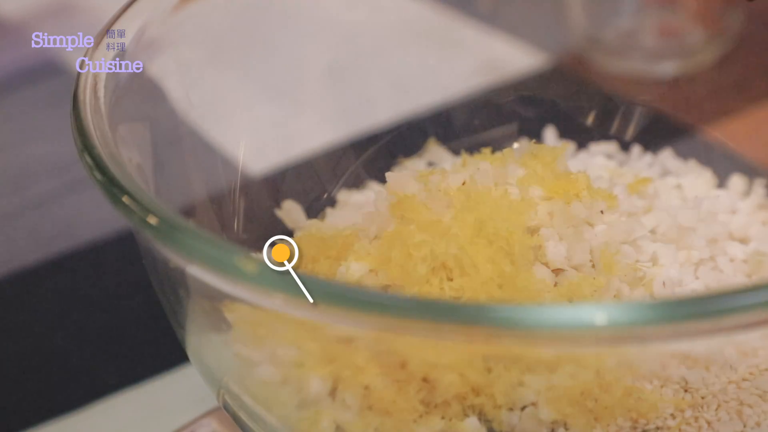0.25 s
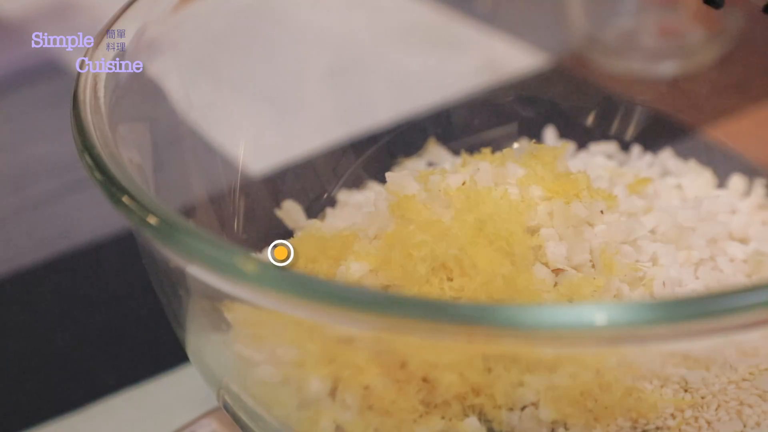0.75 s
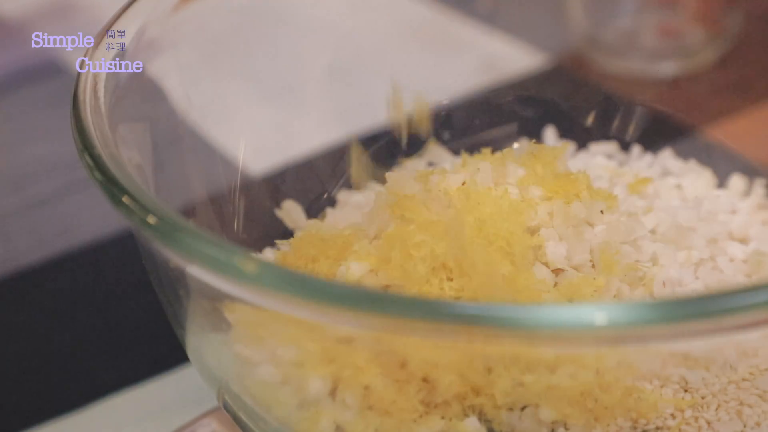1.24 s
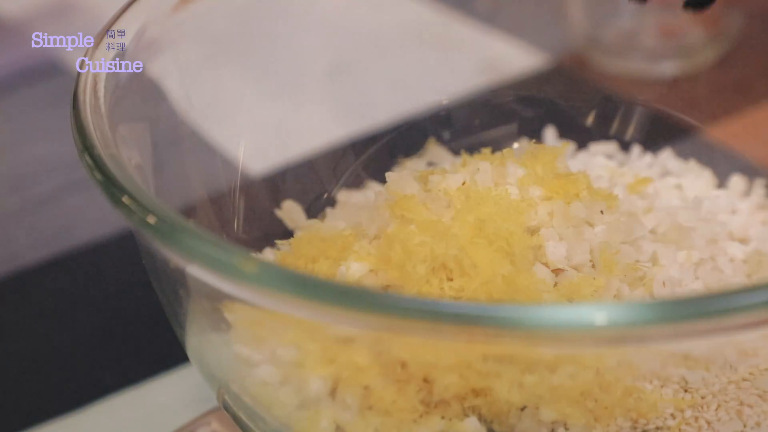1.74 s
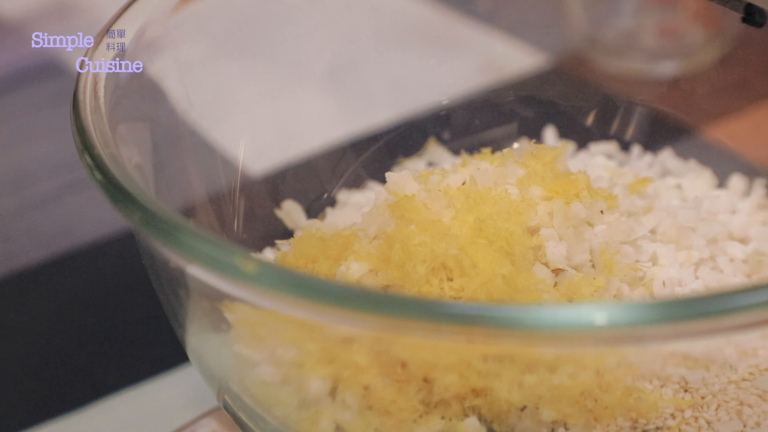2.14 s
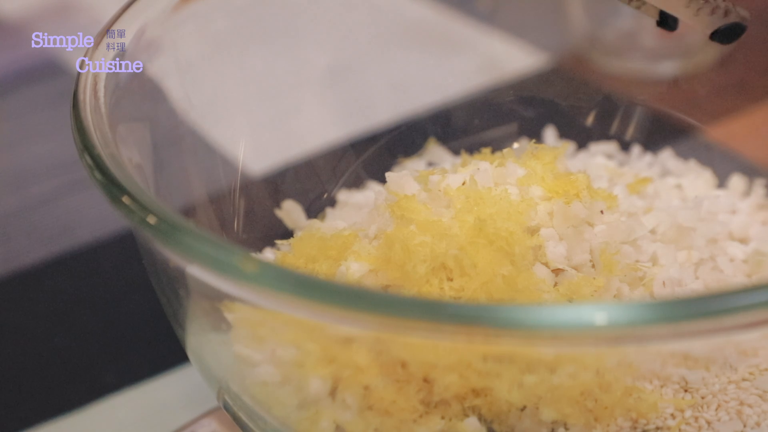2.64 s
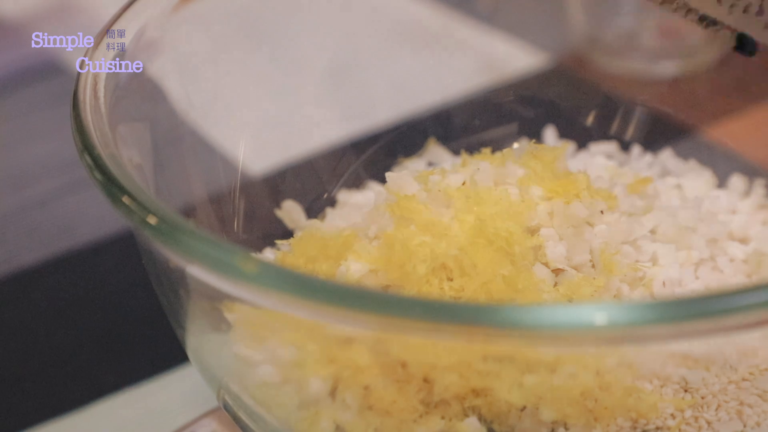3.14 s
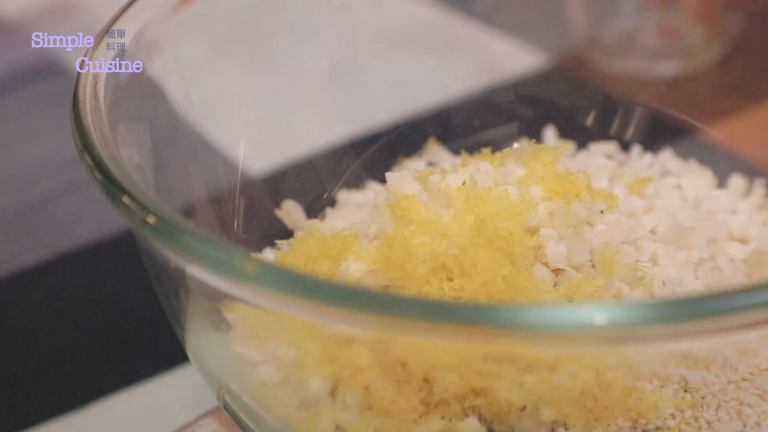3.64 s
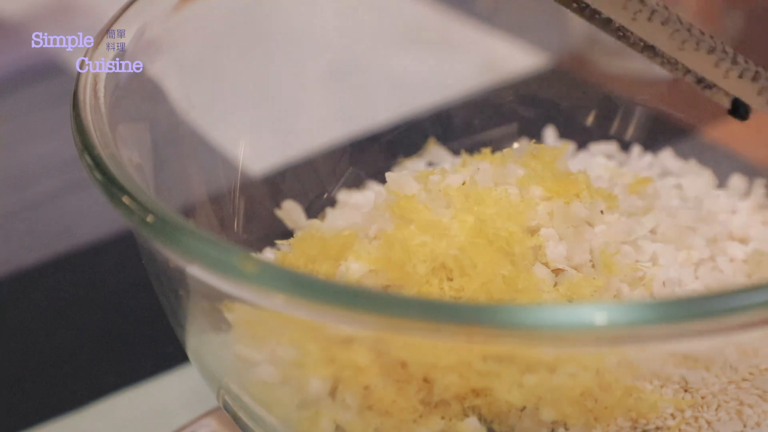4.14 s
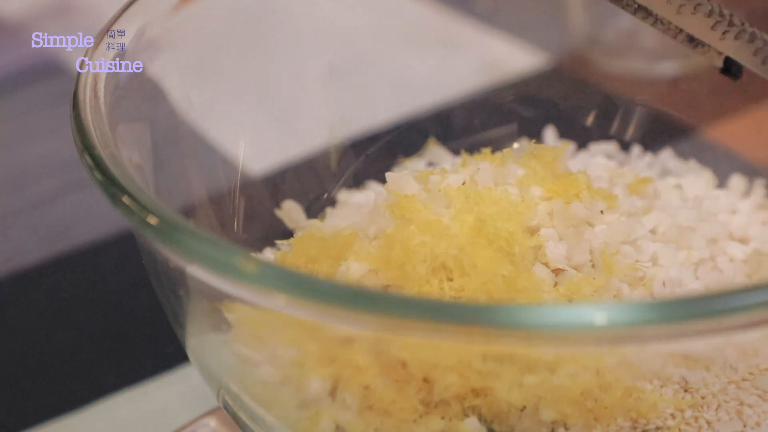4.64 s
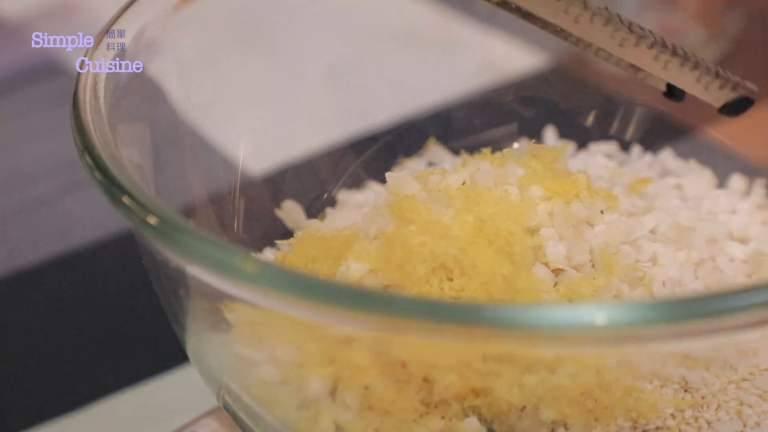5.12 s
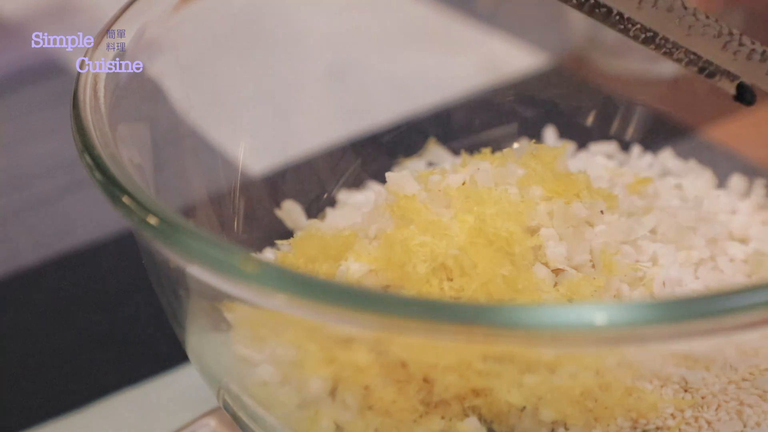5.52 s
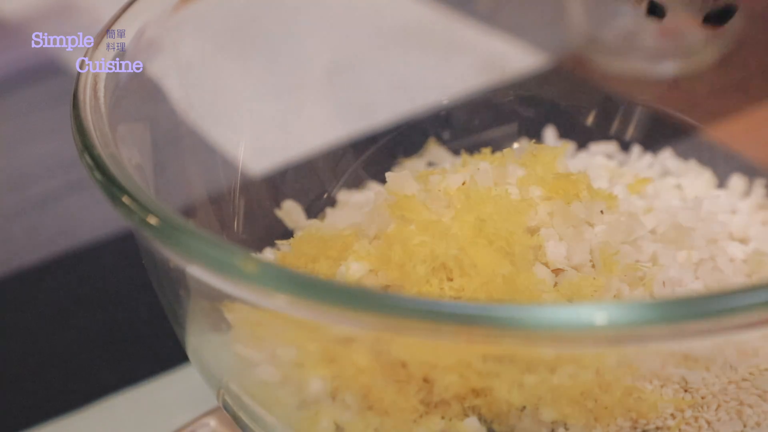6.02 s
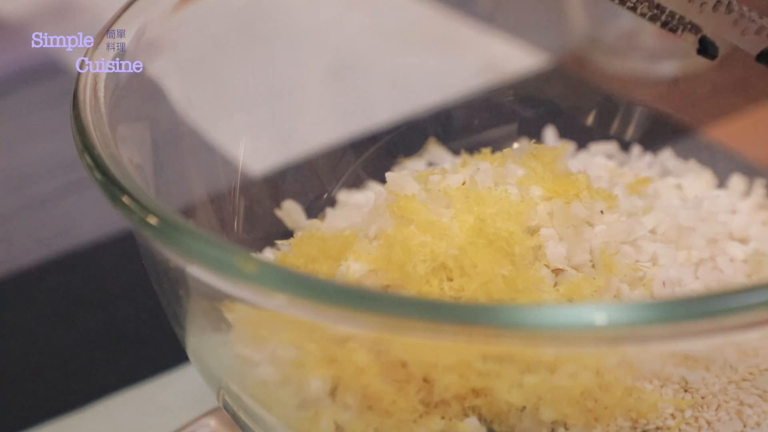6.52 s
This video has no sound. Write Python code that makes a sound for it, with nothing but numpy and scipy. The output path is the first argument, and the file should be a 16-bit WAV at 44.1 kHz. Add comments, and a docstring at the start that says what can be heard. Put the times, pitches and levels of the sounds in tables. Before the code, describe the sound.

Very close in a quiet kitchen, citrus peel is rasped over a fine metal grater above a glass bowl. Five strong, bright strokes alternate with lighter returns, then a sharp knock and two longer, softer rasps. Another knock leads into a pause of faint ticks and finger rustle. Sparse light scrapes follow, then a flurry of short scratches with one longer rasp. Low room rumble and slight hiss remain underneath.

```python
"""In a quiet kitchen, citrus peel is drawn in quick strokes over a fine steel grater above a glass bowl, close by.
Random catches of peel on teeth ring modes of the perforated plate and teeth, under a pressure curve per stroke.
The grater gets a few knocks; ticks and a faint rustle of fingers and peel are filtered crackle and noise.
Below lie noise-band rumble, narrow hums and microphone hiss. The converter clips peaks at full scale."""
import sys
import numpy as np
from scipy import signal
from scipy.io import wavfile
from scipy.ndimage import uniform_filter1d

SR = 44100
rng = np.random.default_rng(int(sys.argv[2]) if len(sys.argv) > 2 else 0)


def master(y):
    """Save y as 16-bit WAV."""
    cut = np.clip(np.atleast_2d(y).T, -1, 1)
    pcm = np.round(cut * 32767)  # scale
    wavfile.write(sys.argv[1], SR, pcm.astype(np.int16))


N = 298537

# resonances of the perforated plate: mode_hz, width_hz, relative_level_db
PLATE_MODES = [(1410, 220, -10.5), (1910, 250, -6), (1990, 127, 5.5), (2262, 110, -6.5), (2790, 210, 1.5),
               (3063, 460, 2), (3594, 150, -0.5), (4340, 720, -8), (4820, 190, -10.5), (6360, 1800, -11.5)]
# resonances of the teeth: mode_hz, width_hz, relative_level_db
TEETH_MODES = [(5980, 5200, -9.5), (7120, 380, 0.5), (7590, 110, 3.5), (8150, 1100, -2), (8660, 1200, -2.5),
               (10570, 610, -0.5), (11760, 1100, -12), (11800, 2800, -11.5), (14200, 2500, -11)]


def undb(db):
    """Decibels to gain."""
    return 10 ** (np.asarray(db) / 20)


def unit(x):
    """Scale to rms 1."""
    return x / np.sqrt(np.mean(x ** 2))


def ring(x, modes):
    """Sum of resonances; neighbours alternate in sign so that the valleys between them stay filled."""
    out = 0
    for k, (hz, width_hz, db) in enumerate(modes):
        b, a = signal.iirpeak(hz, hz / abs(width_hz), SR)
        out = out + (-1) ** k * undb(db) * signal.lfilter(b, a, x)
    return out


def steep(x, hz, kind):
    """Fourth-order Butterworth low- or high-pass."""
    return signal.sosfilt(signal.butter(4, hz, kind, fs=SR, output="sos"), x)


def walk(rate_hz):
    """Random levels held 1 / rate_hz s and slewed twice; spread near 1."""
    k = int(SR / rate_hz)
    steps = np.repeat(rng.standard_normal(N // k + 1), k)
    return 0.77 * uniform_filter1d(uniform_filter1d(steps, k), k)[:N]


def clicks(per_s, spread_db):
    """Random clicks of either sign, most small, a few large; rms 1."""
    hit = rng.random(N) < per_s / SR
    return unit(hit * rng.standard_normal(N) * undb(spread_db * rng.exponential(size=N)))


def grater():
    """Teeth catch and let go of the peel; the grip judders; each catch rings plate and teeth."""
    split_hz = 3300  # lower from upper plate modes
    lower_gain, upper_gain, teeth_gain = pressure()
    judder_db = 1.1 * walk(120) + 0.6 * walk(40)
    catches = clicks(per_s=20000, spread_db=1.0) * undb(judder_db)
    lower_modes = [m for m in PLATE_MODES if m[0] < split_hz]
    upper_modes = [m for m in PLATE_MODES if m[0] >= split_hz]
    out = 0
    for modes, gain in ((lower_modes, lower_gain), (upper_modes, upper_gain), (TEETH_MODES, teeth_gain)):
        part, power = 0, 0
        for mode in modes:
            # teeth sit all over the mode shape and push it either way;
            # the contact point slides, so each mode is fed unevenly
            fed = catches * rng.choice([-1., 1.], N) * undb(2.3 * walk(30))
            part = part + ring(fed * gain, [mode])
            power = power + np.var(ring(fed, [mode]))
        out = out + part / np.sqrt(power)
    # the frame passes a little of the push on as a dull rumble
    rumble = unit(ring(catches, [(550, 290, 0), (900, 960, -4.5)])) * lower_gain * undb(-31.5)
    # little of the plate's sound reaches below about 1 kHz
    out = steep(steep(out, 1316, "high"), 780, "high")
    # the ring falls away above about 12 kHz
    return steep(out, 12600, "low") + rumble


def pressure():
    """Gains of lower modes, upper modes and teeth: each stroke has attack, hold, release and weak after-drag."""
    # cutting strokes: bite_s, hold_s, attack_s, lower_modes_db, change_over_hold_db, upper_above_lower_db,
    # teeth_above_lower_db, upper_rise_over_hold_db, teeth_rise_over_hold_db
    pushes = [(0.134, 0.083, 0.0045, -17, -5.5, -3.0, 4.5, 10, -3),
              (0.409, 0.083, 0.0055, -13.5, -6, -6, 1, 15.5, 2.5),
              (0.655, 0.07, 0.0051, -16, 1.5, -6.5, -0.5, 2, -3.5),
              (0.891, 0.062, 0.0044, -13, -6, -5.5, -1, 1.5, 2),
              (1.125, 0.078, 0.0056, -10, -15, -4.5, 1, 5.5, 1.3),
              (1.528, 0.095, 0.012, -20.5, -1, -6.5, -1, 13, 7),
              (1.637, 0.11, 0.0046, -20.5, 1, -1.0, -0.5, 10, 11.5),
              (3.881, 0.015, 0.0024, -28.5, 5.5, -13, -8.5, 9, 11),
              (3.982, 0.016, 0.0033, -24, -3.5, -2.5, 8.5, 3, 3),
              (4.493, 0.076, 0.0052, -27.5, 7, -3, 2, 7, 3.5),
              (4.718, 0.04, 0.0012, -33, 13, -1.5, -0.5, 3, 7),
              (4.775, 0.016, 0.005, -24.5, -11, -1.5, 1, 3, -2.5),
              (5.648, 0.016, 0.0057, -20, -11, 0.5, 1.5, -3.5, 1.3),
              (5.687, 0.027, 0.005, -22, -12.5, -0.5, -2, 0, 3),
              (5.761, 0.029, 0.0012, -22, 2, 2, 6, 7, -1),
              (5.789, 0.034, 0.0063, -22.5, 7.5, -6, 6.5, -4, -1.5),
              (5.844, 0.15, 0.023, -16, -9, 0, 1, 3, -4.7),
              (6.047, 0.019, 0.047, -34, -12.5, -3.0, -11, 8, 0.1),
              (6.37, 0.024, 0.0058, -26.5, -11, -7, -9, 4, 0.1),
              (6.511, 0.015, 0.0029, -23.5, -6.5, -5.0, -10.5, -1, -5),
              (6.544, 0.029, 0.0036, -12.5, -18, -3.5, -2, 6, 0.1),
              (6.593, 0.018, 0.003, -21.5, -12, -8, -5, 3, -5),
              (6.741, 0.014, 0.0029, -19, 0.5, -14.5, -5.5, 0, 3)]
    # lighter return strokes: same columns
    pulls = [(0.022, 0.058, 0.011, -28, -13, -18, 7.1, 2.3, 12.5),
             (0.287, 0.076, 0.018, -24.5, 1.5, -11.5, 0.5, 3.1, 5),
             (0.552, 0.058, 0.0093, -18, -11, -9, 5.6, 2.5, 9.5),
             (0.789, 0.053, 0.0071, -26.0, -11.5, -10, 8, 2.3, 12),
             (1.009, 0.062, 0.0071, -31.5, 5.5, -10.5, 5.8, 2.1, 10.5),
             (5.073, 0.032, 0.011, -38, -5, -0.5, 5.7, 2.3, 3),
             (5.309, 0.049, 0.0066, -49.5, 12, -30, 1.9, 1.6, 4)]
    # rows lower modes, upper modes, teeth: release_s, after_drag_db, mid_hold_arch_db
    push_shape = [(0.01, -6.5, 3.5), (0.011, -5.5, 4.5), (0.009, -26, 5.5)]
    # return strokes: same rows and columns
    pull_shape = [(0.0075, -25.5, 3.1), (0.0075, -26.5, 6), (0.0072, -24.5, 8.3)]
    drag_s, margin_s = 0.021, 0.15
    t, power = np.arange(N) / SR, np.zeros((3, N))
    for rows, shape in ((pushes, push_shape), (pulls, pull_shape)):
        for bite_s, hold_s, attack_s, db, change_db, upper_db, teeth_db, upper_rise_db, teeth_rise_db in rows:
            near = slice(max(int((bite_s - margin_s) * SR), 0), int((bite_s + hold_s + margin_s) * SR))
            since_s = t[near] - bite_s
            along = np.clip(since_s / hold_s, 0, 1)
            after_s = np.maximum(since_s - hold_s, 0)
            attack = np.exp(np.minimum(since_s, 0) / attack_s)
            layers = ((0, 0), (upper_db, upper_rise_db), (teeth_db, teeth_rise_db))
            for k, (above_db, rise_db) in enumerate(layers):
                release_s, drag_db, arch_db = shape[k]
                held_db = db + above_db + change_db * along + rise_db * (along - 0.5)
                held_db = held_db + arch_db * np.sin(np.pi * along)
                drag = undb(drag_db) * np.exp(-after_s / drag_s)
                lift = np.maximum(np.exp(-after_s / release_s), drag)
                power[k, near] += (undb(held_db) * attack * lift) ** 2
    return np.sqrt(power)


def knocks():
    """A blow that chatters for ms at most, rings plate and teeth, thuds in the frame and leaves a short rattle."""
    # knocks on the grater: start_s, plate_peak_db, thud_above_plate_db, teeth_above_plate_db, chatter_s, rattle_db
    blows = [(1.4404, -5.5, -16, -21, 0.0054, -17), (2.3386, -10.5, -18.5, -8.5, 0.0008, -9.5),
             (6.265, -26.5, -1.5, -1, 0.0033, -25)]
    # dull modes of frame and handle: mode_hz, width_hz, relative_level_db
    frame_modes = [(99, 120, 12.5), (229, 80, 3.5), (350, 150, 0), (570, 170, 9), (760, 160, -15)]
    out, t = np.zeros(N), np.arange(int(0.12 * SR)) / SR
    for start_s, db, thud_db, teeth_db, chatter_s, rattle_db in blows:
        noise = rng.standard_normal(len(t))
        edge = -4 * np.exp(-t / 0.0001)
        chatter = noise * (t < chatter_s) * (rng.random(len(t)) < 0.3)
        rattle = undb(rattle_db) * noise * np.exp(-t / 0.016)
        blow = edge + chatter + rattle
        plate = ring(blow, PLATE_MODES) + undb(-5) * ring(blow, [(1800, 840, 0)]) + undb(-25.0) * edge
        teeth = ring(blow, TEETH_MODES)
        thud = ring(-edge, frame_modes)
        hit = plate / np.abs(plate).max()
        hit = hit + undb(teeth_db) * teeth / np.abs(teeth).max()
        hit = hit + undb(thud_db) * thud / np.abs(thud).max()
        i = int(start_s * SR)
        out[i:i + len(t)] += undb(db) * hit
    return out


def ticks():
    """Faint ticks and brushes as the fruit is turned in the hand: short noise bursts, each around its own pitch."""
    # start_s, peak_db, centre_hz, decay_s
    tick_rows = [(2.131, -40.5, 7730, 0.0026), (2.175, -40.5, 9300, 0.0029), (2.314, -44, 4000, 0.0029),
                 (2.607, -41.5, 3000, 0.0021), (2.733, -35, 2300, 0.0088), (3.242, -46, 10060, .004),
                 (3.456, -42, 3300, 0.008), (3.522, -38.5, 8000, 0.004), (6.259, -43, 7000, .001)]
    out, t = np.zeros(N), np.arange(int(0.06 * SR)) / SR
    for start_s, db, hz, decay_s in tick_rows:
        shape = t / decay_s * np.exp(-t / decay_s)
        burst = ring(rng.standard_normal(len(t)) * shape, [(hz, 0.8 * hz, 0)])
        i = int(start_s * SR)
        out[i:i + len(t)] += undb(db) * burst / np.abs(burst).max()
    return out


def rustle():
    """Fingers and peel: fine crackle, mostly treble, that flickers."""
    # level curve of the treble: time_s, rms_db
    level_points = [(0, -59), (1.2, -51), (1.3, -51), (1.42, -57.5), (1.81, -54), (1.9, -52), (1.97, -54),
                    (2.04, -50.0), (2.3, -59.5), (2.46, -54), (2.62, -57.5), (2.65, -48.5), (2.76, -48.5),
                    (2.83, -53.5), (3.02, -47.5), (3.12, -49.5), (3.2, -56.5), (3.245, -49), (3.3, -55.5),
                    (3.6, -52), (3.68, -55), (3.82, -43.5), (3.88, -39.5), (4.1, -55.5), (4.28, -47),
                    (4.33, -53.5), (4.68, -52.5), (4.9, -54.5), (5.0, -46.5), (5.03, -44), (5.06, -36.5),
                    (5.16, -55.5), (5.26, -57), (5.31, -45.5), (5.42, -50.5), (5.55, -52.0), (5.62, -47.5),
                    (6.09, -47.5), (6.25, -55), (6.3, -62), (6.5, -50.5), (6.77, -59.0)]
    treble_db = np.interp(np.arange(N) / SR, *np.transpose(level_points))
    low_db = -60 + 0.87 * (treble_db + 52)  # -60 dB where the treble is at -52 dB
    flicker_db = 3.1 * walk(60) + 1.3 * walk(20)
    grain = clicks(per_s=6000, spread_db=1.0) * undb(flicker_db)
    treble = ring(grain, [(7750, 1800, -4.0), (11000, 4400, -7.5), (13800, 3500, -8.5)])
    low = ring(grain, [(2450, 8200, 0), (4680, 8700, -2)])
    treble = undb(treble_db) * unit(steep(treble, 5500, "high"))
    return treble + undb(low_db) * unit(steep(low, 1300, "high"))


def kitchen():
    """Third-octave bands of rumble that flicker alone, wavering hums, and the microphone's hiss."""
    # rumble spectrum: band_hz, relative_level_db_per_hz
    spectrum = [(25, -12.5), (60, -6.5), (130, -9), (200, -12), (400, -14), (1000, -19), (1300, -24),
                (3000, -38)]
    # narrow hums: centre_hz, width_hz, rms_before_swell_db
    hums = [(105, 8.2, -64), (150, 6.5, -56.5), (244, 6.7, -64.5)]
    # slow swell of rumble and hums: time_s, gain_db
    swell_points = [(0, 1.5), (1, 2), (1.998, 1), (3, 1), (3.998, -1.5), (5, -2.5), (6.2, 0), (6.3, -6.5),
                    (6.77, -3.5)]
    rumble_db, hiss_db = -52.5, -64  # rms; rumble before the swell
    out, (hzs, dbs) = 0, np.transpose(spectrum)
    for hz in 28 * 2 ** np.arange(0, 6.7, 1 / 3):
        density_db = np.interp(np.log(hz), np.log(hzs), dbs)
        band_db = density_db + 10 * np.log10(hz) + 2.5 * walk(4)
        out = out + undb(band_db) * unit(ring(rng.standard_normal(N), [(hz, hz / 6, 0)]))
    out = unit(out) * undb(rumble_db)
    for hz, width_hz, db in hums:
        hum = unit(ring(rng.standard_normal(N), [(hz, width_hz, 0)]))
        out = out + undb(db + 0.52 * walk(5.2)) * hum
    swell_db = np.interp(np.arange(N) / SR, *np.transpose(swell_points))
    return out * undb(swell_db) + undb(hiss_db) * rng.standard_normal(N)


def scene():
    """Mix all layers; grater and knocks get a short tail from bowl and worktop."""
    near = grater() + knocks()
    t, decay_60db_s = np.arange(int(0.2 * SR)) / SR, 0.045
    tail = steep(rng.standard_normal(len(t)), 3800, "low") * np.exp(-np.log(1000) * t / decay_60db_s)
    wet = signal.fftconvolve(near, tail / np.linalg.norm(tail))[:N]
    return (near + undb(-18.5) * wet + rustle() + ticks() + kitchen())[None]


def record(dry):
    """The converter clips near full scale; a steep elliptic low-pass cuts the top."""
    top_hz = 15700
    flat = np.clip(dry, -0.97, 0.97)
    return signal.sosfilt(signal.ellip(10, 0.2, 70, top_hz, fs=SR, output="sos"), flat)


dry = scene()
out = record(dry)
master(out)
```